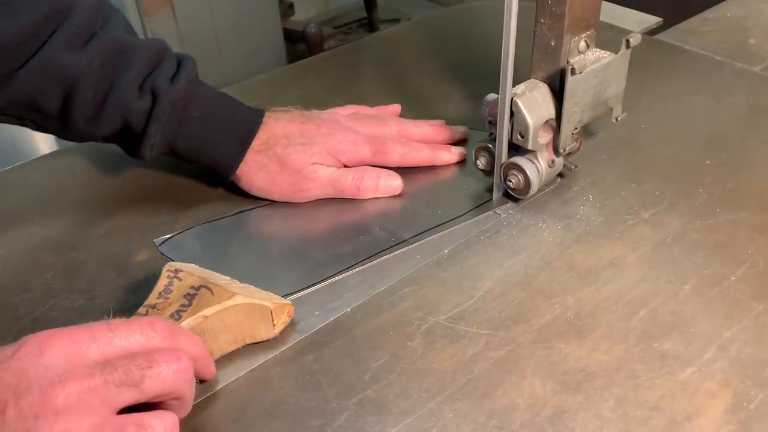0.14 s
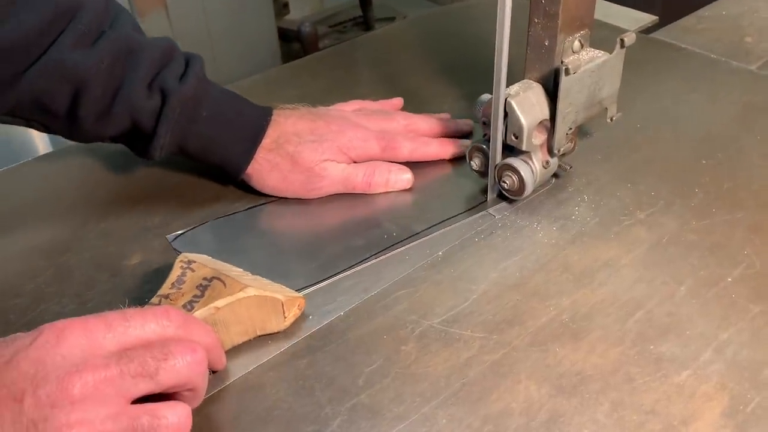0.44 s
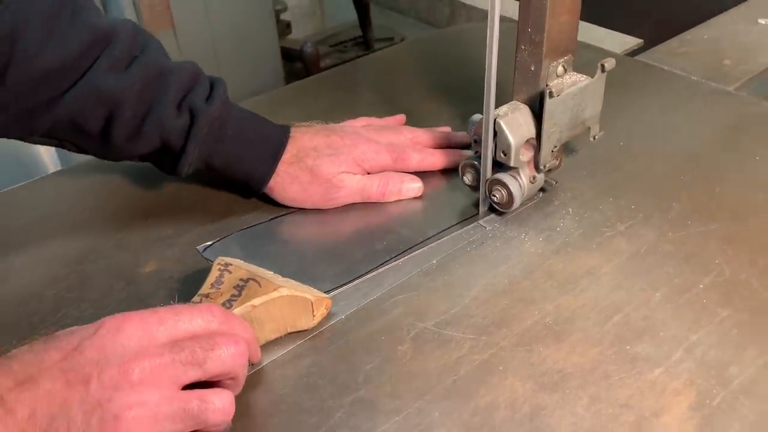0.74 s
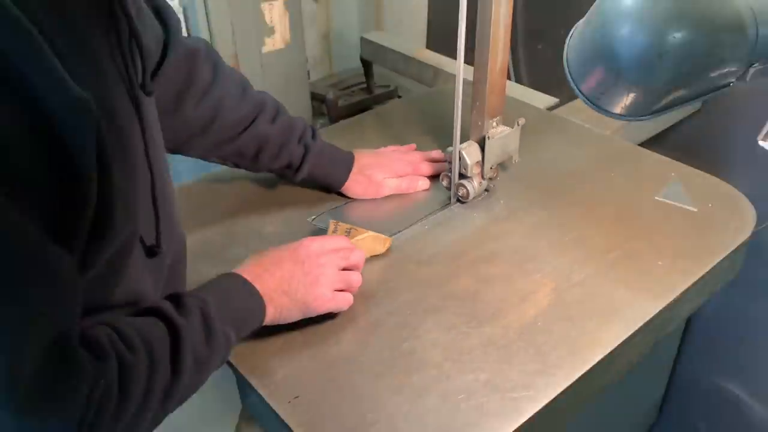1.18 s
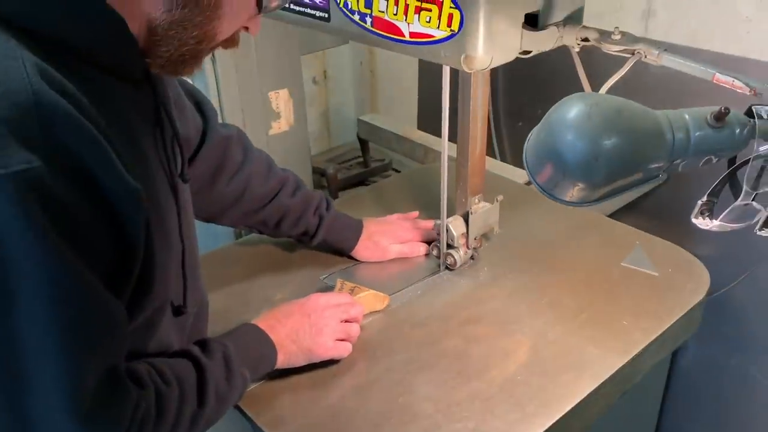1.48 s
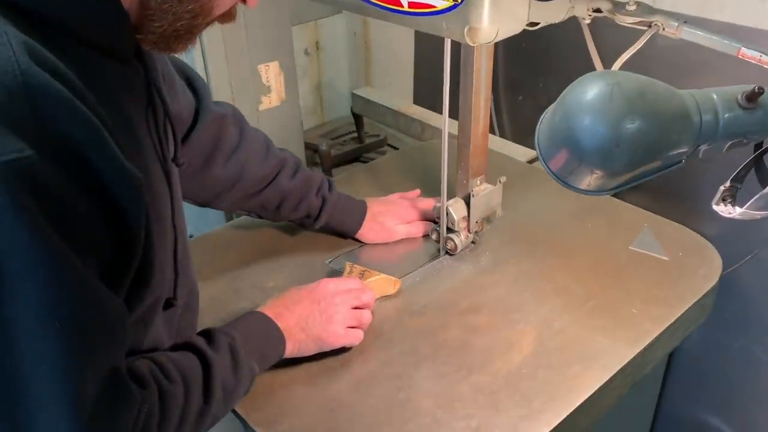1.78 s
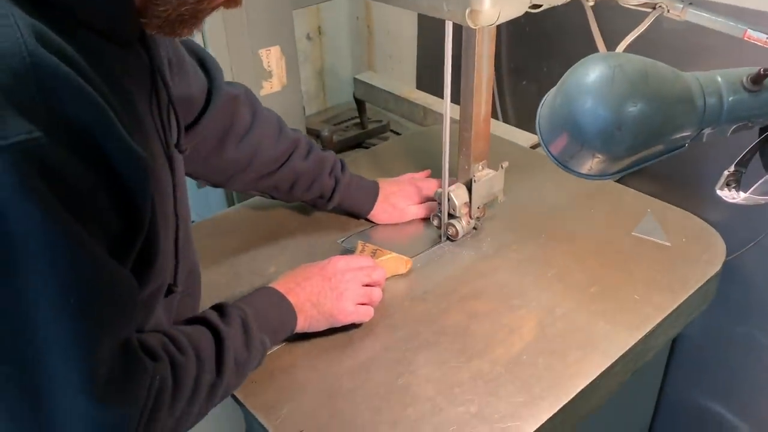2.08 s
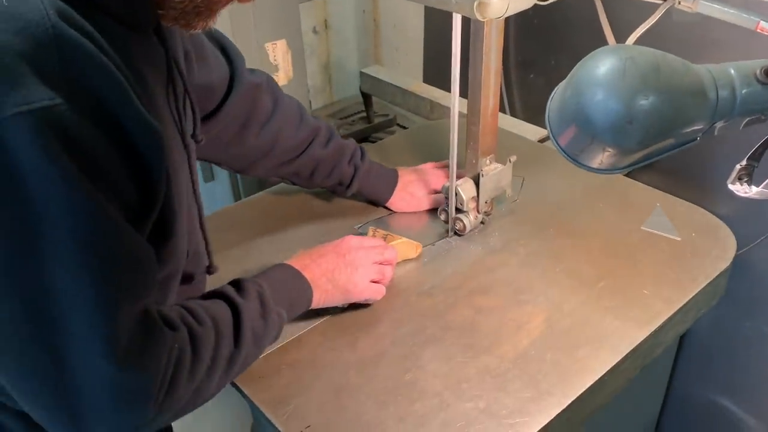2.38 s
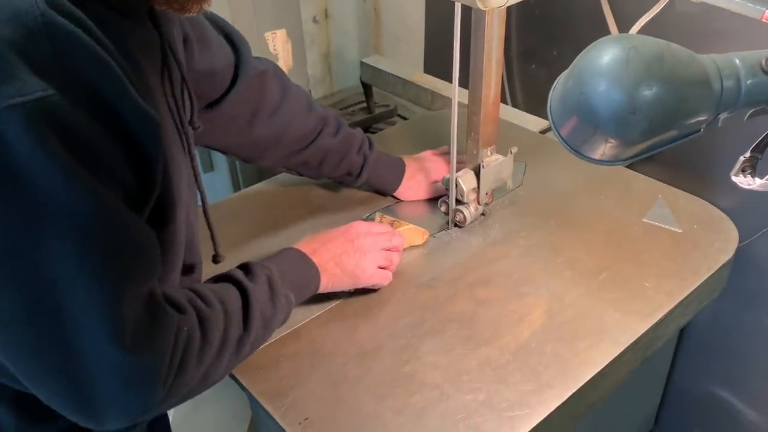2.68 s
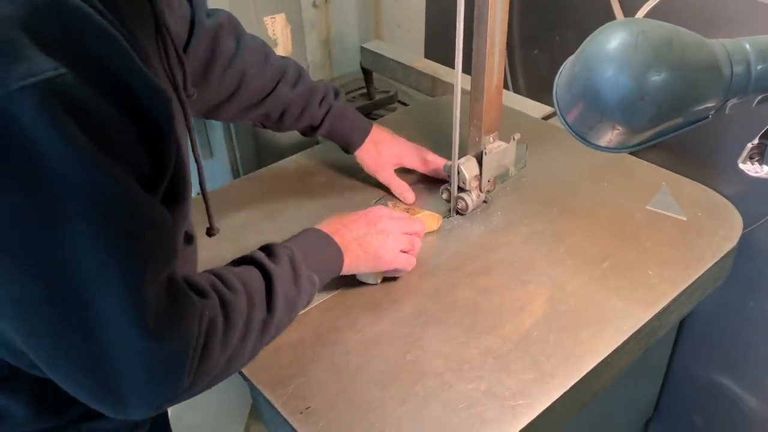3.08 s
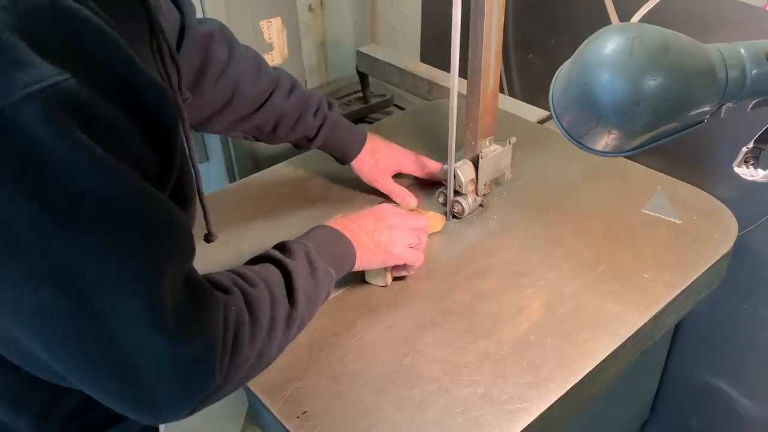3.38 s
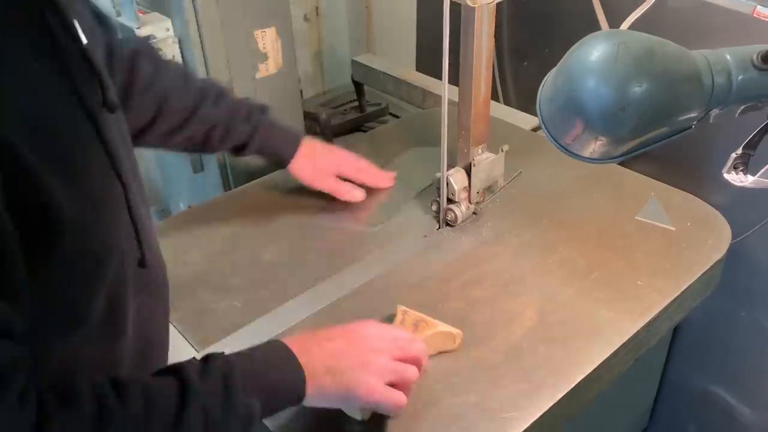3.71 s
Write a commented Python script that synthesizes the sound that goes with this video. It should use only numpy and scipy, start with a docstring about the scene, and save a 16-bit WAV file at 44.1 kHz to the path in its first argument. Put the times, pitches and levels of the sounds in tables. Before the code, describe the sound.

Bandsaw teeth hiss and squeal steadily through thin steel, heard first close and then slightly farther off; late on, the cut breaks twice, resumes louder, then ends, leaving the machine's whirring in a small shop.

```python
"""A vertical bandsaw cuts thin steel sheet in a workshop; a two-port phone stands close, then steps back.
Each tooth bites the sheet: a hiss of uneven chips, and a squeal whose pitch swings once a tooth.
The feed stops twice, then ends. Beneath, gears and shafts whine as harmonics and sines; wheels, band
and guides rush as filtered noise. Shop echoes and a faint low rumble lie behind."""
import sys
import numpy as np
from scipy import signal
from scipy.fft import rfft, irfft
from scipy.io import wavfile
from scipy.ndimage import uniform_filter1d

SR = 44100
rng = np.random.default_rng(int(sys.argv[2]) if len(sys.argv) > 2 else 0)


def pcm_store(signal):
    """Save signal as 16-bit PCM."""
    levels = np.round(np.clip(np.atleast_2d(signal), -1, 1) * 32767)
    wavfile.write(sys.argv[1], SR, levels.astype(np.int16).T)


def how_loud(loudness_db):
    """Turn decibels into a plain amplitude multiplier (0 dB gives 1, 20 dB gives 10)."""
    steps = np.asarray(loudness_db, float) / 20
    return 10 ** steps


N = 169785

# Pressure of the sheet on the blade: t/s, base level of the cut/dB
FEED_LEVEL = [(0.0, -51), (0.1, -53), (0.25, -51), (0.45, -54), (0.54, -53), (1.1, -55.5), (1.2, -53.5),
              (1.39, -56), (1.45, -53), (1.73, -52), (2.57, -52), (2.76, -51), (2.92, -51), (3.012, -47),
              (3.03, -56), (3.038, -50.5), (3.325, -48), (3.41, -48.5), (3.5, -48.5), (3.63, -51.5),
              (3.7, -52.5)]
# Teeth run free of the metal: start t/s, end t/s, level change/dB
FEED_PAUSES = [(2.94, 2.995, -19), (3.35, 3.396, -13), (3.718, 3.9, -17)]
# Cutting sound heard close to the blade: f/Hz, spectral density/dB
CUT_CLOSE_COLOUR = [(1060, -28), (1800, -6.5), (1990, -22), (2280, -4), (2470, -23.5), (2540, -1),
                    (2910, -6.5), (3130, -11), (3400, -8), (4120, -12), (4500, -7), (4720, -3), (5200, -3),
                    (5520, -2), (6140, -4.5), (6790, 2), (7430, -5.5), (8060, -3), (8830, -6), (10200, -3),
                    (13300, -7), (14800, -2.5), (15800, -6)]
# Cutting sound heard from farther back: f/Hz, spectral density/dB
CUT_FAR_COLOUR = [(1290, -36.5), (2200, -2), (2260, -28), (2390, -6), (2680, 5), (2840, -11.5), (3140, 7.5),
                  (3410, -29), (3700, -2.5), (3920, 6), (4740, -6), (5020, -0.5), (5360, -1.5), (5540, 3.5),
                  (5780, 1.5), (6590, -4), (7100, 3.5), (7340, 6.5), (7560, 2), (7820, -1.5), (8300, -2),
                  (10600, -1), (11500, -8), (12800, -3), (13100, -10), (13500, -12), (14100, -6),
                  (15000, -1), (15400, -6.5), (15800, -5.5)]
# Top treble as the phone turns: t/s, level in the cut/dB, level in the port difference/dB
PHONE_TREBLE = [(0, -5, -3), (.2, 0.5, -0.5), (.9, 2, 2.5), (1.1, 1, 1), (1.3, 6.5, -1), (1.45, 9.5, -1),
                (2.25, 7, 0), (2.5, 7.5, 2), (2.8, 5.5, 6), (3.05, -0.5, 3.5), (3.5, 1.5, 4), (3.85, 8, 6)]
# Multiples of the tooth rate that ring (no unit)
RINGING_ORDERS = [20, 21, 22, 23, 24, 25, 26, 27, 28, 34, 42, 43, 44, 45, 46, 47, 49, 50, 51, 52, 53, 54,
                  63, 65]
# Their levels relative to the base level of the cut, a row per order: close level/dB, far level/dB
RINGING_LEVELS = [(-18, -28), (-11.5, -18), (-12, -20.5), (-9, -14), (-26, -20), (-20, -19), (-17.5, -15),
                  (-31, -23), (-24, -33), (-26.5, -15), (-17, -24), (-14.5, -20), (-18, -19.5), (-22, -24),
                  (-18, -25), (-16, -20.5), (-14, -24), (-12.5, -10.5), (-17, -13), (-28.5, -40),
                  (-26, -18), (-18, -21.5), (-20, -19.5), (-19, -23)]
# Rough part of the squeal, relative to the cut: harmonic (no unit), close level/dB, far level/dB
ROUGH_HARMONICS = [(1, -19, -19), (2, 1, -6), (3, -9, -6)]
# Strength of the rough squeal: t/s, level/dB
ROUGH_LEVEL = [(0, -7.5), (.4, -3), (.6, 2.5), (.85, 0), (1.1, 0.5), (1.5, -2.5), (1.9, 2), (2.2, -3.5),
               (2.5, 0), (3.2, 2.5), (3.6, -1), (3.85, -5)]
# Resonances of sheet and blade, heard from afar: f/Hz, width/Hz, level relative to the cut/dB
SHEET_RINGS = [(1054, 34, -16), (1150.2, 39.5, -10), (2052, 36, -16), (2640, 40, -21.5), (3150, 48, -25.5),
               (5758, 44, -15), (7160, 120, -14), (7520, 380, -17)]
# Running machine: t/s, base level of the drive/dB
DRIVE_LEVEL = [(0.0, -60.5), (0.06, -57.5), (0.23, -57), (0.43, -64), (0.9, -63.5), (2.11, -58),
               (2.31, -56.5), (2.97, -54), (3.51, -54), (3.85, -54)]
# Rush of the machine heard close: f/Hz, spectral density/dB
DRIVE_CLOSE_COLOUR = [(150, -58), (250, -21.5), (410, -9), (553, -8), (633, -7.5), (781, 2), (855, -6),
                      (1150, 5.5), (1320, -4.5), (1920, -0.5), (2550, 0), (3550, -6.5), (4380, -8.5),
                      (4790, -22), (5490, -19), (6190, -19), (9000, -9), (11700, -6), (19800, -120)]
# Rush of the machine from farther back: f/Hz, spectral density/dB
DRIVE_FAR_COLOUR = [(150, -59), (250, -30.5), (443, -5), (660, -14), (967, -2.5), (1440, -3.5), (1550, -4),
                    (1690, -1), (2110, -9), (2600, 0.5), (2890, -7), (3040, -6.5), (3880, -1), (4690, -6.5),
                    (4940, -15.5), (6410, -9), (6990, -14.5), (8610, -9.5), (9230, -13.5), (11200, -8),
                    (12000, -21), (14500, -20), (15800, -25)]
# Multiples of the gear rate that whine (no unit)
WHINE_ORDERS = [1, 2, 3, 4, 5, 6, 7, 8, 10, 11, 13, 14, 16]
# Their levels relative to the drive, a row per order: close level/dB, far level/dB
WHINE_LEVELS = [(-30, -30), (-13.5, -15), (-13, -24), (-10, -11), (-11, -11), (-17, -16), (-16, -18),
                (-29, -18), (-9, -11.5), (-10, -12), (-11, -11), (-18, -28), (-22, -12.5)]
# Shaft and motor tones: f/Hz
SHAFT_TONES_HZ = [263, 360, 369, 431.2, 503.1, 551.7, 575, 790.7, 933.9, 1005.3, 1028]
# Their levels relative to the drive, a row per tone: close level/dB, far level/dB
SHAFT_LEVELS = [(-39, -35.5), (-26, -26.5), (-24.5, -24.5), (-19, -19), (-17.5, -26.5), (-12.5, -16),
                (-13, -15.5), (-4.5, -11.5), (-16.5, -14), (-13, -20), (-16, -9.5)]
# Filter of the difference between the microphone ports, close: f/Hz, gain/dB
PORTS_CLOSE = [(60, 6.5), (200, 2), (380, -7.5), (700, -15), (820, -24), (1000, -24), (1290, -41),
               (3300, -29), (3800, -5.5), (5000, -7), (5600, -31), (7000, -25), (8100, -8), (9200, -25),
               (10500, -9.5), (12000, -3), (14600, -1), (15500, -10)]
# Filter of the difference between the microphone ports, far: f/Hz, gain/dB
PORTS_DISTANT = [(60, 9), (200, 1.5), (380, -17), (700, -12), (820, -25), (1050, -24.5), (1290, -38.5),
                 (3300, -25.5), (4000, -20), (5600, -30.5), (7800, -27.5), (8800, -11), (10000, -17),
                 (12000, -1), (13200, -8.5), (14600, 3.5), (15300, -3), (15800, -1)]
# Low rumble: t/s, base level/dB
RUMBLE_LEVEL = [(0.0, -77), (0.26, -90), (0.31, -80.5), (0.93, -88.5), (1.37, -92), (1.4, -85),
                (3.56, -83.5), (3.69, -76), (3.76, -90), (3.85, -81.5)]
# Colour of the low rumble: f/Hz, spectral density/dB
RUMBLE_SPECTRUM = [(12, -37.5), (20, -5), (177, -6), (243, -2.5), (287, -3), (330, -23), (430, -43),
                   (730, -120)]


def curve(rows, col=1):
    """A table column interpolated over the take's time axis."""
    return np.interp(np.arange(N) / SR, [r[0] for r in rows], [r[col] for r in rows])


def colour(x, points):
    """Filter by gain points, joined linearly in dB over log frequency."""
    point_hz, point_db = np.array(points, float).T
    hz = np.maximum(np.fft.rfftfreq(N, 1 / SR), 1)
    gain_db = np.interp(np.log(hz), np.log(point_hz), point_db)
    return irfft(rfft(x) * how_loud(gain_db), N)


def unit(x):
    """Scale to rms 1."""
    return x / np.sqrt(np.mean(x ** 2))


def walk(rate):
    """Random levels held 1 / rate s, smoothed twice; spread near 1."""
    hold = int(SR / rate)
    steps = np.repeat(rng.standard_normal(N // hold + 1), hold)
    smooth = uniform_filter1d(uniform_filter1d(steps, hold), hold)
    return unit(smooth[:N])


def turning(hz, wander, jitter=0):
    """Phase in radians of a rotation whose rate wanders slowly and jitters."""
    rate = hz * (1 + wander * walk(6) + jitter * walk(150))
    return 2 * np.pi * np.cumsum(rate) / SR


def tone(phase, waver_db, rate):
    """A sine from a random start phase, rms 1 before its level wavers."""
    start = 2 * np.pi * rng.random()
    return np.sqrt(2) * np.cos(phase + start) * how_loud(waver_db * walk(rate))


def views(x, close_colour, far_colour, levels_db, away):
    """One vibration coloured for a close and a far microphone, blended by distance."""
    close = how_loud(levels_db[0]) * unit(colour(x, close_colour))
    far = how_loud(levels_db[1]) * unit(colour(x, far_colour))
    return (1 - away) * close + away * far


def flickering(flicker_db):
    """Noise in overlapping bands half an octave apart, each flickering on its own."""
    octave = np.log2(np.maximum(np.fft.rfftfreq(N, 1 / SR), 1))
    spectrum = rfft(rng.standard_normal(N))
    noise = 0
    for centre in np.arange(8, 15, .5):
        share = np.clip(1 - 2 * abs(np.maximum(octave, 8) - centre), 0, 1)
        noise = noise + irfft(spectrum * share, N) * how_loud(flicker_db * walk(14))
    return noise


def shelf(x, db, hz):
    """Change the level above a corner over time."""
    top = signal.sosfiltfilt(signal.butter(4, hz, "high", fs=SR, output="sos"), x)
    return x + (how_loud(db) - 1) * top


def cut(away, gear):
    """Tooth bites throw uneven chips that hiss, ring and squeal; returns port sum and difference."""
    tooth_hz = 112.5
    phase = turning(tooth_hz, wander=.0005, jitter=.002)
    pulse = 1 + .04 * np.cos(phase) + .04 * np.cos(gear)
    chips = how_loud(.8 * walk(2 * tooth_hz)) * pulse
    # an independent noise for the sum and for the difference of the ports
    bites = np.array([views(chips * flickering(.6), CUT_CLOSE_COLOUR, CUT_FAR_COLOUR, (4, 2), away)
                      for _ in range(2)])
    bites[0] = shelf(bites[0], curve(PHONE_TREBLE), 11300)
    bites[0] += away * rings(chips)
    bites[0] += squeal_lines(phase, away) + rough_squeal(phase, away)
    return how_loud(curve(FEED_LEVEL) + feed_stops()) * bites


# the blade chatters on one multiple of the tooth rate; each bite swings that pitch
CHATTER_ORDER, CHATTER_SWING_RAD = 24, 2.4


def squeal_lines(phase, away):
    """Squeal locked to the bites: multiples of the tooth rate, signed as in a phase swung once a tooth."""
    lines = 0
    turn = np.linspace(0, 2 * np.pi, 256, endpoint=False)
    for order, (close_db, far_db) in zip(RINGING_ORDERS, RINGING_LEVELS):
        harmonic = round(order / CHATTER_ORDER)
        offset = order - harmonic * CHATTER_ORDER
        # sign of this sideband of the phase modulation
        sign = np.sign(np.mean(np.cos(harmonic * CHATTER_SWING_RAD * np.sin(turn) - offset * turn)))
        level_db = close_db + (far_db - close_db) * away + 1.7 * walk(20)
        lines = lines + how_loud(level_db) * sign * np.sqrt(2) * np.cos(order * phase)
    return lines


def rough_squeal(phase, away):
    """Blurred squeal: chatter harmonics whose phase swings once a tooth and slips at random."""
    rough = 0
    slip = .75 * walk(180)  # radians
    swing = CHATTER_ORDER * phase + CHATTER_SWING_RAD * np.sin(phase) + slip
    for harmonic, close_db, far_db in ROUGH_HARMONICS:
        vibration = how_loud(1.94 * walk(110)) * np.cos(harmonic * swing)
        heard = views(vibration, CUT_CLOSE_COLOUR, CUT_FAR_COLOUR, (close_db, far_db), away)
        rough = rough + how_loud(curve(ROUGH_LEVEL) + 1.3 * walk(8.833)) * heard
    return rough


def rings(chips):
    """Chips excite narrow resonances of sheet and blade, each fluttering on its own."""
    impacts = chips * rng.standard_normal(N)
    ringing = 0
    for hz, width_hz, db in SHEET_RINGS:
        resonance = signal.lfilter(*signal.iirpeak(hz, hz / width_hz, SR), impacts)
        ringing = ringing + how_loud(db + 1.5 * walk(7)) * unit(resonance)
    return ringing


def feed_stops():
    """Level change in dB as the teeth leave the metal, ring out and bite again."""
    ring_out_s, bite_again_s = .035, .025
    t, change_db = np.arange(N) / SR, 0
    for start, end, depth_db in FEED_PAUSES:
        edges = np.minimum((t - start) / ring_out_s, (end - t) / bite_again_s)
        change_db = change_db + depth_db * np.clip(edges + .5, 0, 1)
    return change_db


def drive(away, gear):
    """Gear and shaft whine over the rush of wheels, band and guides; returns port sum and difference."""
    t = np.arange(N) / SR
    pulse = 1 + .15 * np.cos(gear)
    machine = np.array([views(pulse * flickering(.88), DRIVE_CLOSE_COLOUR, DRIVE_FAR_COLOUR, (6, 3.5), away)
                        for _ in range(2)])
    for order, (close_db, far_db) in zip(WHINE_ORDERS, WHINE_LEVELS):
        level = how_loud(close_db + (far_db - close_db) * away)
        machine[0] += level * tone(order * gear, waver_db=2.65, rate=15)
    for hz, (close_db, far_db) in zip(SHAFT_TONES_HZ, SHAFT_LEVELS):
        level = how_loud(close_db + (far_db - close_db) * away)
        machine[0] += level * tone(2 * np.pi * hz * t, waver_db=.39, rate=4.98)
    return how_loud(curve(DRIVE_LEVEL)) * machine


def port_difference(other, away):
    """Closely spaced ports differ by a frequency-dependent amount that changes with distance."""
    heard = (1 - away) * colour(other, PORTS_CLOSE) + away * colour(other, PORTS_DISTANT)
    return shelf(heard, curve(PHONE_TREBLE, col=2), 9600)


def port_notch(saw, away):
    """At a distance the ports partly cancel in their sum, in a narrow treble band."""
    notch_hz, width_hz, depth = 14630, 560, .6
    band = signal.lfilter(*signal.iirpeak(notch_hz, notch_hz / width_hz, SR), saw)
    return saw - depth * away * band


def workshop_echoes(x, t60_s):
    """Echoes of the shop: a noise response that fades by 60 dB in t60_s."""
    t = np.arange(SR // 2) / SR
    tail = rng.standard_normal(len(t)) * np.exp(-np.log(1000) * t / t60_s)
    return signal.fftconvolve(x, tail / np.sqrt(np.sum(tail ** 2)))[:N]


def rumble():
    """A faint uneven rumble of low noise, stronger at the right port; returns mid and side."""
    mid, side = (unit(colour(rng.standard_normal(N), RUMBLE_SPECTRUM)) * how_loud(1.8 * walk(10))
                 for _ in range(2))
    return how_loud(curve(RUMBLE_LEVEL)) * np.array([mid, how_loud(-4.5) * side - .25 * mid])


def scene():
    """Saw and shop at two close microphone ports, left and right."""
    away = curve([(.83, 0), (1.26, 1)])  # 0 close to the blade, 1 stepped back
    gear = turning(238.87, wander=.0003)
    saw, other = cut(away, gear) + drive(away, gear)
    other = port_difference(other + .066 * saw, away)
    saw = port_notch(saw, away)
    shop = saw + how_loud(-15) * workshop_echoes(saw, t60_s=.3)
    mid, side = rumble() + [shop, other]
    return np.array([mid + side, mid - side])


def top_cut(x):
    """Nothing passes above the cut-off."""
    return signal.sosfilt(signal.butter(12, 15800, fs=SR, output="sos"), x)


def record(dry):
    """The phone cuts the top with a steep low-pass at 15.76 kHz."""
    low_pass = signal.ellip(10, .2, 70, 15760, fs=SR, output="sos")
    finished = signal.sosfilt(low_pass, dry)
    return top_cut(finished)


dry = scene()
out = record(dry)
pcm_store(out)
```